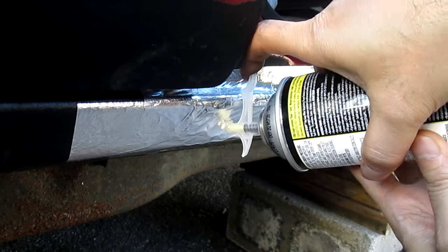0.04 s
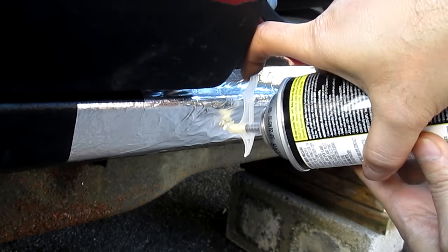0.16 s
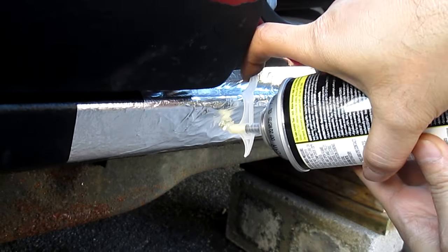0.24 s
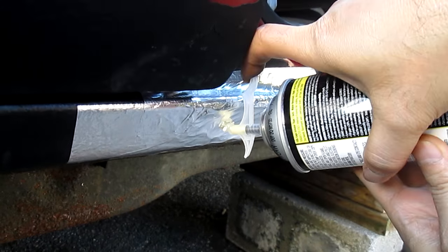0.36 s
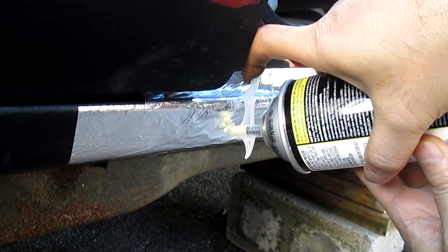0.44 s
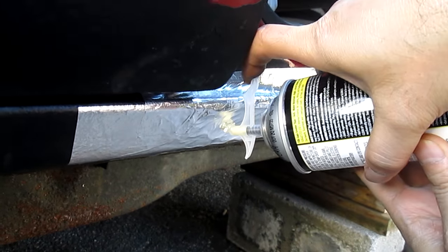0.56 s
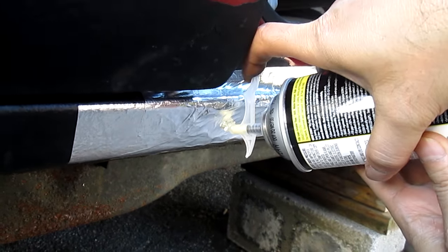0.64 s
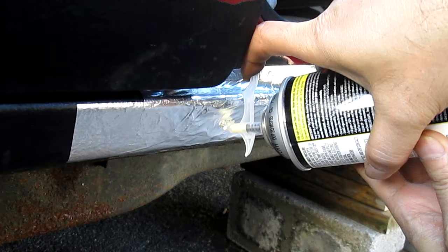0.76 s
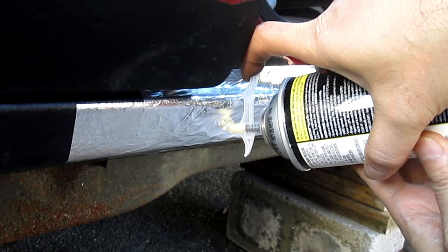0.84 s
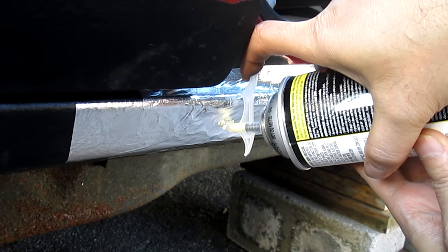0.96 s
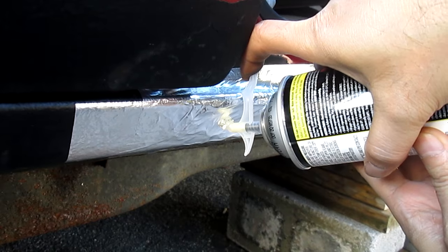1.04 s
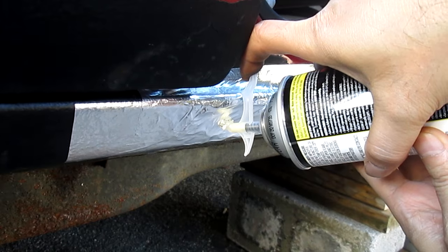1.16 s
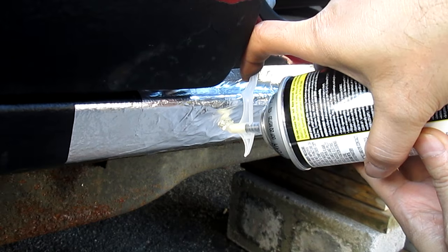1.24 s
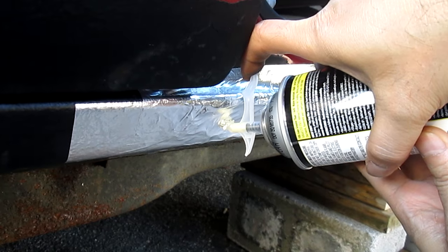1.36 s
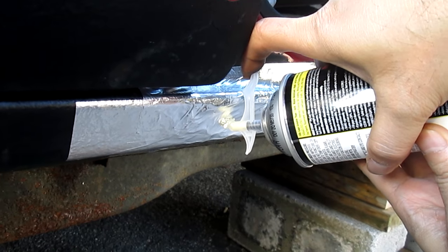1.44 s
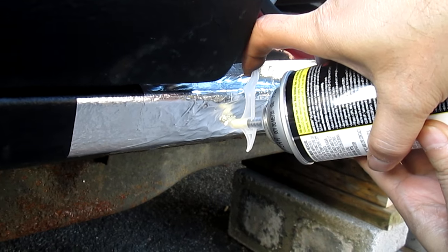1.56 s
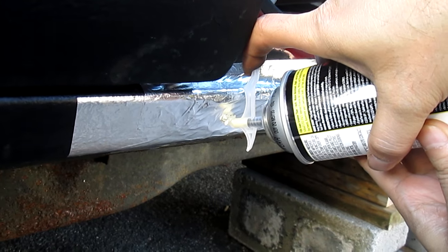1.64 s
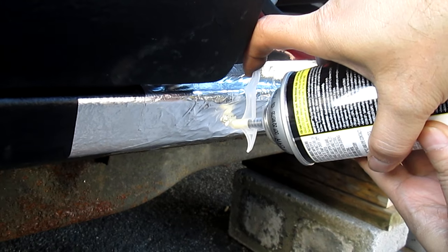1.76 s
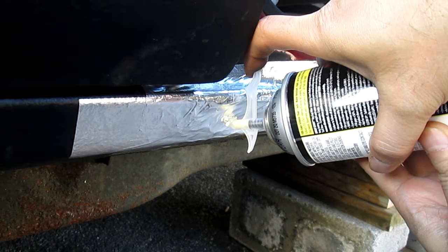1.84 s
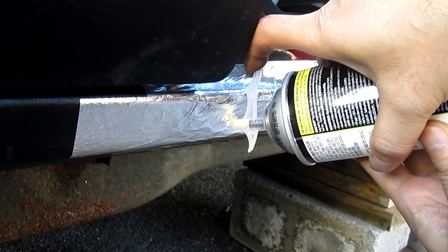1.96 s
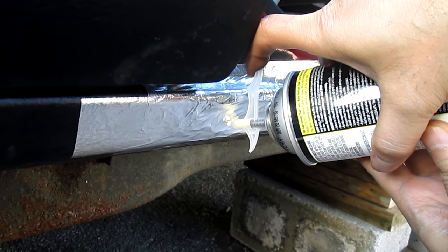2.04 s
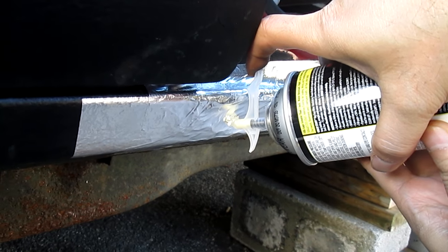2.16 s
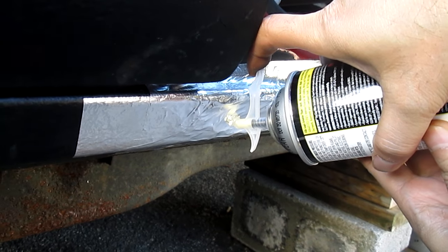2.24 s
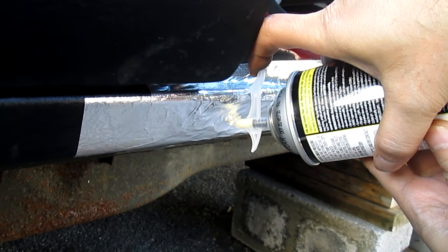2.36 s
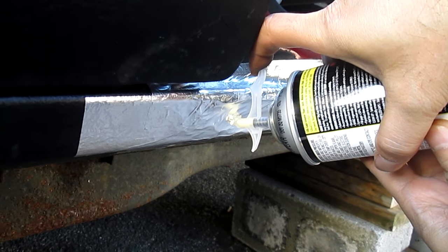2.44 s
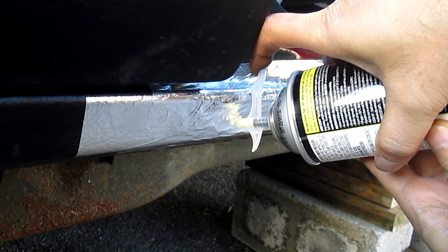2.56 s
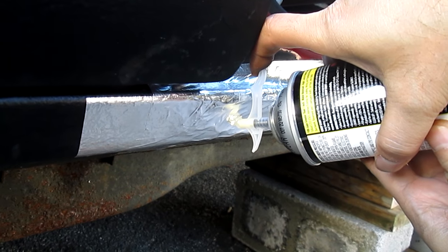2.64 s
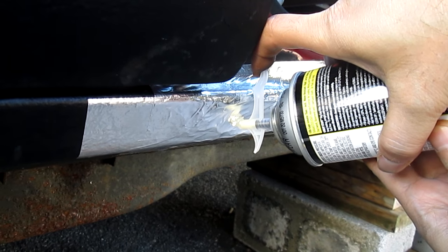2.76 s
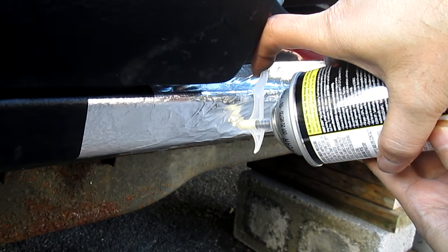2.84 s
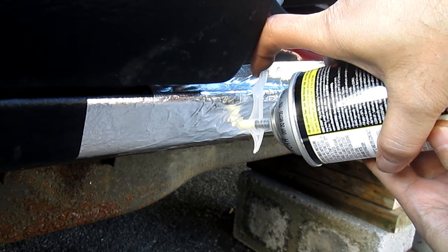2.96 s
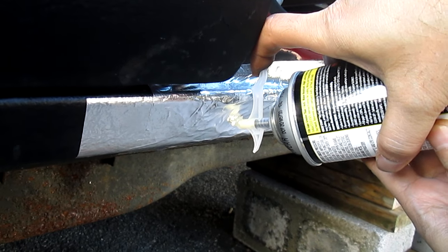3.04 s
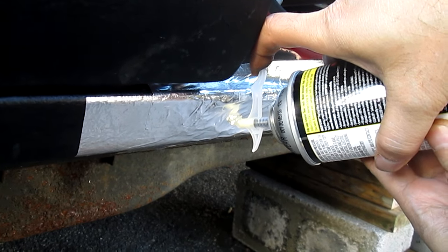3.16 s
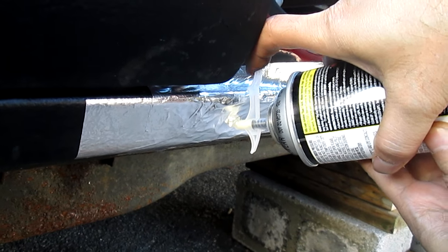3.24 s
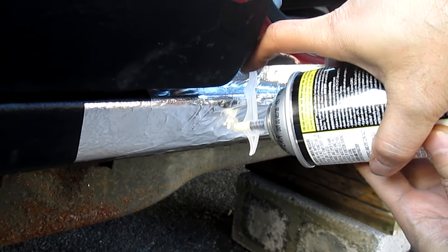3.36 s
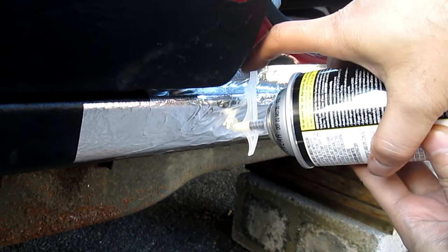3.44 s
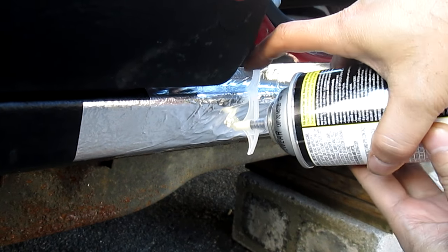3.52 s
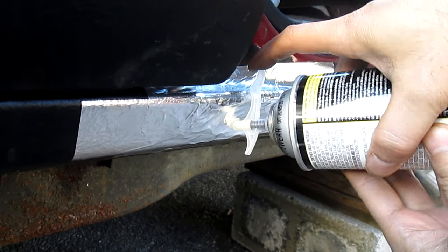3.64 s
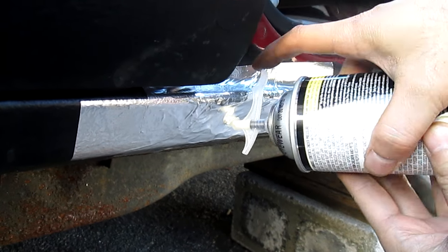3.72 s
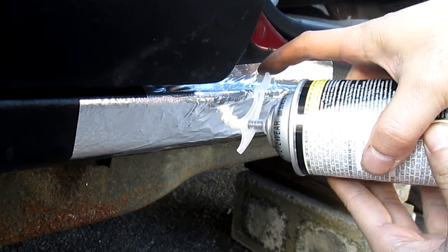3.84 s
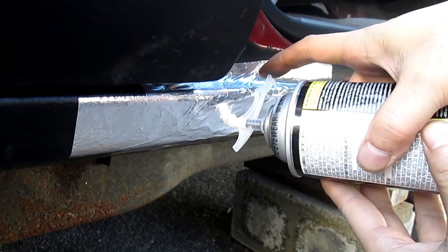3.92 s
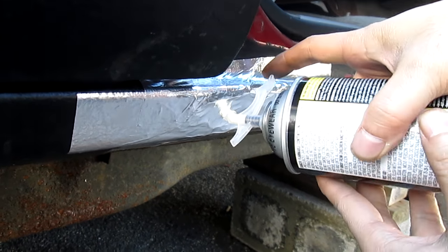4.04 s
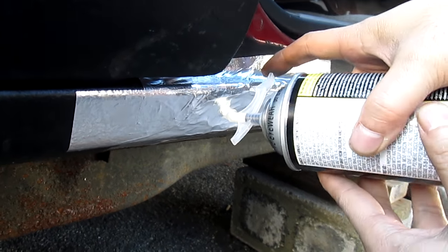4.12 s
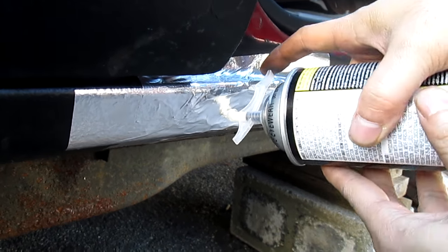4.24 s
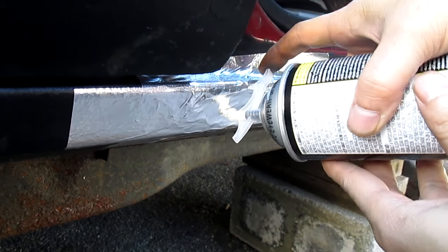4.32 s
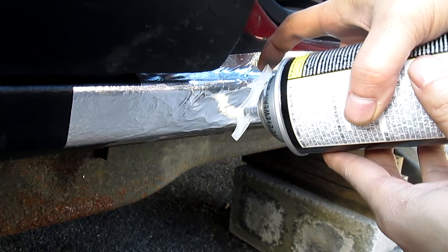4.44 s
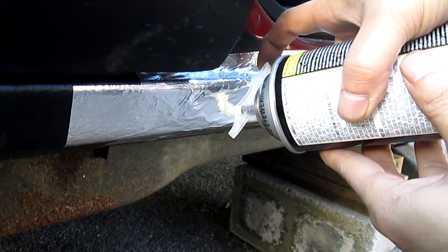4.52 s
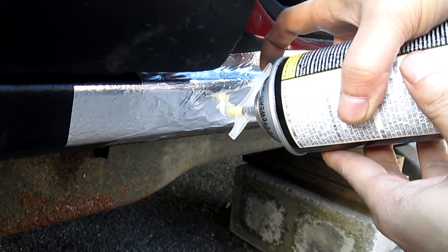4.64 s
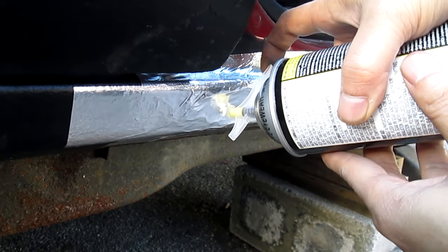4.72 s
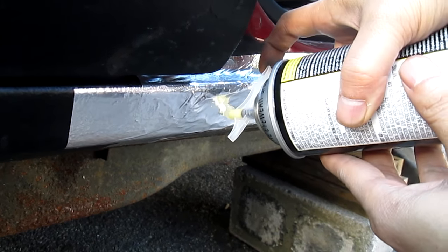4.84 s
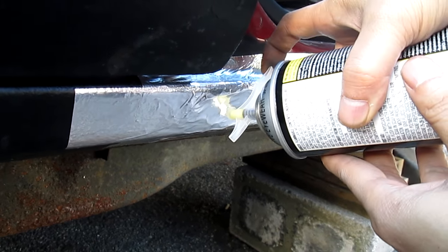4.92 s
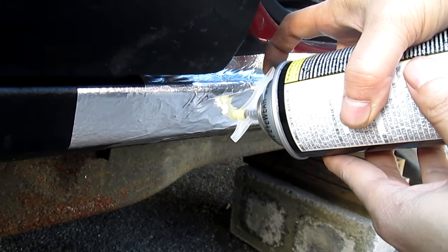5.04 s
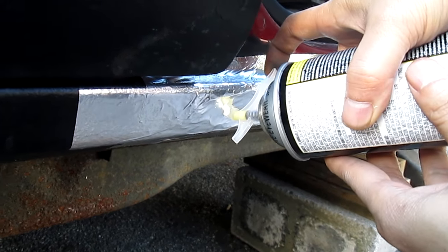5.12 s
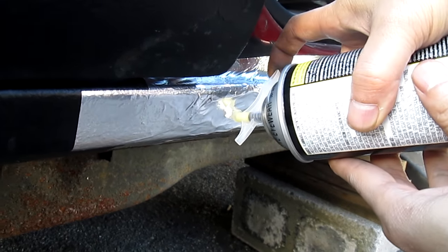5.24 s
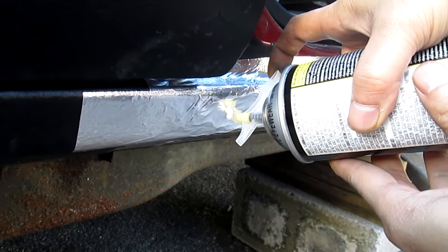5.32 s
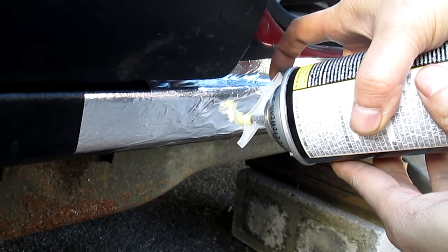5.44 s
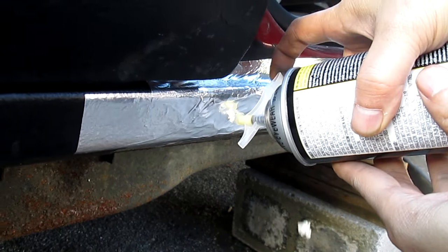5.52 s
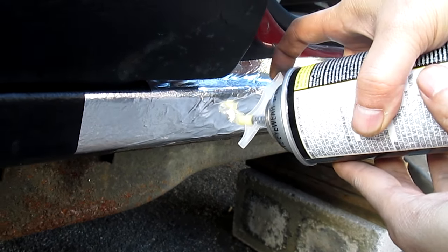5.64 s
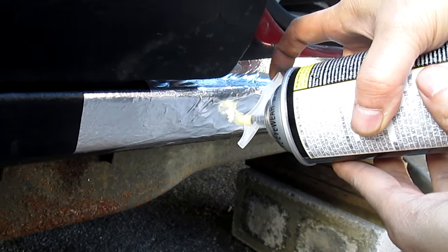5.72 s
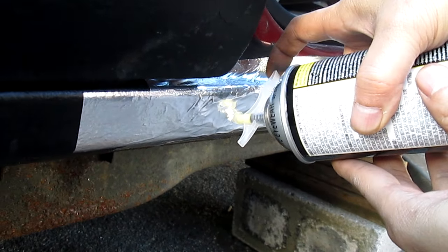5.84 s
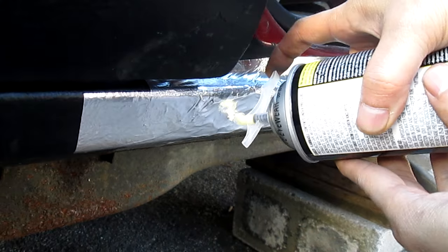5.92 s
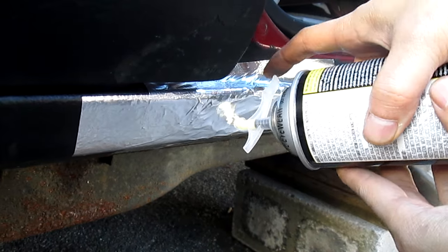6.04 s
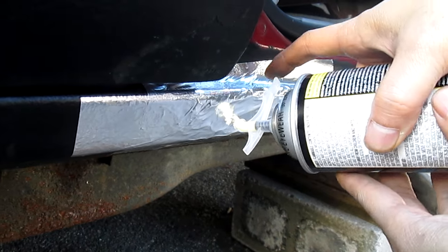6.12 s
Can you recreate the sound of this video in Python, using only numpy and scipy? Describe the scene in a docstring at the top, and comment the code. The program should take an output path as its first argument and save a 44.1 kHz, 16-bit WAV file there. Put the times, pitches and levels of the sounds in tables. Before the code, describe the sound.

Pressurised foam sprays close by in one long fizzing hiss, pauses with a plastic click, then splutters again more wetly over low wind rumble.

```python
"""A can of foam is emptied through its straw into the sill of a car: a long burst, then a short, wetter one.
Gas and foam leave in quick sputters: noise shaped by resonances into a gurgle, rasp, jet hiss and fizz.
The plastic trigger clicks between the bursts, during the second and after it: short noise rings its tones.
Outdoors, wind rumbles on the microphone (low noise), the open air rushes (noise) and engines drone (sines)."""
import sys
import numpy as np
from scipy import signal
from scipy.fft import rfft, irfft
from scipy.io import wavfile
from scipy.ndimage import uniform_filter1d

SR = 44100
rng = np.random.default_rng(int(sys.argv[2]) if len(sys.argv) > 2 else 0)


def store_wav(level_fs):
    """Save 16-bit WAV to argv[1]."""
    pcm = np.round(np.clip(np.atleast_2d(level_fs), -1, 1) * 32767)
    wavfile.write(sys.argv[1], SR, pcm.T.astype(np.int16))


N = 272538

# the seal parts quickly, the finger needs longer to push the valve wide open,
# and once the seal is shut the straw bleeds empty (time to fall to 37 %)
PART_S, PUSH_S, BLEED_S = 0.028, 0.3, 0.010785


def gain_of(db):
    """Turns decibels into a factor."""
    return 10 ** (np.asarray(db) / 20)


def evened(x):
    """Scales a sound to rms 1."""
    return x / np.sqrt(np.mean(x ** 2) + 1e-20)


def ramp(u):
    """Rises from 0 to 1 and stays there."""
    return np.clip(u, 0, 1)


def follow(rows, t):
    """Reads the columns of a table at times t, with straight lines between its rows."""
    s, *columns = np.transpose(rows)
    return [np.interp(t, s, column) for column in columns]


def read(points, hz):
    """Reads a table of f/Hz, level/dB on a log-frequency axis."""
    f, db = np.transpose(points)
    return np.interp(np.log(hz + 1), np.log(f), db)


def bells(rows, hz):
    """Adds up peaks and dips, in dB."""
    return sum(db / (1 + (2 * (hz - f) / width) ** 2) for f, width, db in rows)


def coloured(x, db_at, size=8192):
    """Filters with the gain db_at(Hz), down to -100 dB, without sounding ahead of time."""
    db = np.maximum(db_at(np.fft.rfftfreq(size, 1 / SR)), -100)
    log_gain = np.log(gain_of(np.r_[db, db[-2:0:-1]]))
    # the minimum-phase filter of this gain
    spectrum = np.exp(np.conj(signal.hilbert(log_gain)))
    taps = np.fft.ifft(spectrum).real
    return signal.oaconvolve(x, taps[:size // 2])[:len(x)]


def resonate(x, hz, width):
    """A resonance of gain 1, width in Hz, that follows the curve hz."""
    turn = np.exp(2j * np.pi * np.cumsum(hz) / SR)
    r = np.exp(-np.pi * width / SR)
    # shift the resonance down to 0 Hz, smooth there, and shift back
    smoothed = signal.lfilter([1 - r], [1, -r], x / turn)
    return 2 * (turn * smoothed).real


def wander(n, hz):
    """Slow random drift, made of frequencies up to about hz."""
    f = np.fft.rfftfreq(N, 1 / SR)
    slow = rfft(rng.standard_normal(N)) / (1 + (f / hz) ** 4)
    return evened(irfft(slow, N))[:n]


def add(mix, s, sound):
    """Mixes a sound in at time s."""
    part = mix[round(s * SR):][:len(sound)]
    part += sound[:len(part)]


def wash(level_db, flicker_db):
    """The rush of the open air: noise with a fixed colour and a slight flicker."""
    # colour of the open air: f/Hz, level/dB (relative)
    air_colour = [(100, -6), (350, -4.5), (500, 0.5), (650, -2), (820, -2.5), (1040, -4.5), (1350, -8.5),
                  (1600, -11.5), (2700, -19.5), (3500, -23.5), (4400, -25), (7000, -30), (10000, -36),
                  (13000, -43), (15000, -56)]
    air = evened(coloured(rng.standard_normal(N), lambda hz: read(air_colour, hz)))
    return air * gain_of(level_db + flicker_db * wander(N, 40))


def hum(t, hz, db, waver, fading_db):
    """One engine order, a sine: it swells in, wavers in pitch and level, and dies away."""
    fade_s = 0.14
    turn = 2 * np.pi * np.cumsum(hz * (1 + waver * wander(len(t), 8.2))) / SR
    swell = ramp((t - t[0]) / fade_s) * ramp((t[-1] - t) / fade_s)
    level = gain_of(db + fading_db * wander(len(t), 3.6))
    return t[0], swell * level * evened(np.sin(turn))


def engines(waver, fading_db):
    """Engines heard from afar: only their lowest orders, slow sines, carry this far."""
    # values that hum() lets waver; a nearer engine idles: t/s, f/Hz, level/dB
    idle = [(0, 39.5, -30), (0.45, 39, -27.5), (0.85, 38.57, -33.5), (1.15, 39.29, -27.5),
            (1.95, 38.1, -32), (2.25, 38.23, -26), (2.6, 38.56, -27.5), (2.85, 39, -37),
            (4.05, 39.8, -28.5), (4.6, 40, -47.5)]
    # a far engine slowly gathers speed: t/s, f/Hz, fundamental level/dB, second order level/dB
    far_engine = [(0, 70.8, -35, -47.5), (0.9, 70.7, -34.5, -46), (1.2, 73.86, -25.5, -36.5),
                  (1.65, 75, -31.5, -42.5), (2.0, 75.22, -23.5, -34), (2.2, 74.5, -33.5, -38),
                  (2.5, 75.03, -27, -36), (3.3, 78.86, -31, -38), (3.899, 77.17, -42.5, -29.5),
                  (4.3, 81.55, -44, -33), (4.95, 79.6, -46, -35.5)]
    # other traffic drones in and out: start t/s, end t/s, start f/Hz, end f/Hz, level/dB
    drones = [(4.15, 4.84, 91.8, 98.4, -33), (4.799, 5.75, 53.2, 52.6, -37.5), (5.6, 6.3, 127, 124.9, -34)]
    out = np.zeros(N)
    t = np.arange(idle[0][0], idle[-1][0], 1 / SR)
    add(out, *hum(t, *follow(idle, t), waver, fading_db))
    t = np.arange(far_engine[0][0], far_engine[-1][0], 1 / SR)
    hz, first_db, second_db = follow(far_engine, t)
    add(out, *hum(t, hz, first_db, waver, fading_db))
    add(out, *hum(t, 2 * hz, second_db, waver, fading_db))
    for start, end, start_hz, end_hz, db in drones:
        t = np.arange(max(start, 0), end, 1 / SR)
        add(out, *hum(t, np.linspace(start_hz, end_hz, len(t)), db, waver, fading_db))
    return out


def wind(t, trim_db, lumps_db):
    """Wind on the microphone: lumpy low noise, with a few buffets of wavering pitch."""
    # colour of the rumble: f/Hz, level/dB (relative)
    rumble_colour = [(12, -9), (25, -15), (55, 0.5), (100, 1), (135, -3), (185, -5), (240, -8.5),
                     (330, -15.5), (600, -52), (1200, -70.5)]
    # strength of the wind before trim and lumps: t/s, level/dB
    strength = [(0.0, -27.5), (2.1, -29.5), (2.65, -29), (3.8, -28), (4.65, -27.5), (4.9, -32),
                (5.3, -24.5), (5.55, -27), (6.18, -26.5)]
    # gusts that buffet the microphone: middle t/s, length/s, mean f/Hz, level before fading in and out/dB
    gusts = [(4.669, 0.24, 99.7, -23), (5.975, 0.095, 107.3, -21.5)]
    rumble = evened(coloured(rng.standard_normal(N), lambda hz: read(rumble_colour, hz)))
    out = rumble * gain_of(follow(strength, t)[0] + trim_db + lumps_db * wander(N, 9.913))
    for s, length, hz, db in gusts:
        n = round(length * SR)
        eddy = np.sin(2 * np.pi * np.cumsum(hz * (1 + 0.17 * wander(n, 40))) / SR)
        add(out, s - length / 2, gain_of(db) * evened(eddy) * np.hanning(n))
    return out


def outdoors(x, echo_db, t60_s):
    """The surroundings return a faint, short echo: a dying tail of noise."""
    t = np.arange(SR // 3) / SR
    tail = rng.standard_normal(len(t)) * gain_of(-60 * t / t60_s)
    return x + gain_of(echo_db) * signal.oaconvolve(x, tail / np.linalg.norm(tail))[:N]


def click(s, peak_db, bright_db, thump_db):
    """The trigger snaps and chatters briefly, ringing its tones; the can jolts in the hand, a low thump."""
    # what trigger and can ring with: f/Hz, level/dB (relative), time to fall by 60 dB/s
    ring_tones = [(990.73, -10, 0.018035), (1497, -1, 0.01), (1976.6, 0, 0.0084), (2380, 5, 0.011),
                  (2660, 8.5, 0.0086), (3280, -4, .006)]
    t = np.arange(SR // 8) / SR
    snap = 0.19 * rng.standard_normal(len(t)) * np.exp(-t / 0.0061)
    snap[0] = 1
    modes = sum(gain_of(db - 60 * t / t60) * np.sin(2 * np.pi * hz * t) for hz, db, t60 in ring_tones)
    ring = signal.oaconvolve(snap, modes)[:len(t)]
    ring = coloured(ring, lambda hz: bright_db * np.log2(np.clip(hz, 500, 9000) / 2000))
    thump = -np.sin(2 * np.pi * 62 * t) * np.exp(-t / 0.032)
    return s, gain_of(peak_db) * ring / abs(ring).max() + gain_of(thump_db) * thump


def scattered(x, echo_db, fade_s):
    """Hand, can, car and ground throw the sound back within a few milliseconds: sparse random echoes."""
    t = np.arange(SR // 30) / SR
    signs = rng.choice([-1, 1], len(t))
    present = (rng.random(len(t)) < .1) * (t > .001)
    taps = signs * present * np.exp(-t / fade_s)
    taps *= gain_of(echo_db) / np.linalg.norm(taps)
    taps[0] = 1  # the direct sound
    return signal.oaconvolve(x, taps)[:len(x)]


def valve(press, t):
    """How freely gas passes the seal, and how wide the valve stands, both 0-1."""
    start, stop, let_go_s = press
    bleed = np.exp(-np.maximum(t - stop, 0) / BLEED_S)
    parted = ramp((t - start) / PART_S) ** 2 * bleed
    return parted, ramp((t - start) / PUSH_S) * ramp((stop - t) / let_go_s)


def flow_levels(flow, t, opening, unsteady_db):
    """Levels of gurgle, rasp, jet and fizz in dB: the flow, lifted by spurts and choked by the valve."""
    # a plug of foam or pocket of gas comes through: middle t/s, length/s, foam change/dB, gas change/dB
    spurts = [(1.504, 0.11, -1.5, 1.5), (3.343, 0.0586, -0.5, 1.5), (4.587, 0.16, -2, 9.5),
              (4.697, 0.11, 9, 4), (4.999, 0.06, 1.5, 1.5)]
    # a barely open valve chokes the fizz most, the rasp hardly: gurgle/dB, rasp/dB, jet/dB, fizz/dB
    choke_db = [-12.5, -0.5, -14.5, -35]
    rasp_share = 0.28  # share of a spurt that reaches the rasp
    gurgle, rasp, jet, fizz = follow(flow, t)
    foam = np.zeros(len(t))
    gas = unsteady_db * wander(len(t), 9.7)
    for s, length, foam_db, gas_db in spurts:
        arch = np.sin(np.pi * ramp((t - s) / length + .5)) ** 2
        foam = foam + foam_db * arch
        gas = gas + gas_db * arch
    levels = [gurgle + foam, rasp + rasp_share * (foam + gas), jet + gas, fizz + gas]
    return [level + choke * (1 - opening) ** 1.5 for level, choke in zip(levels, choke_db)]


def sputters(rate, jitter, puff_s):
    """Strength of the gas flow: each slug of foam that clears the straw lets a short puff through."""
    n = len(rate)
    uneven_rate = rate * np.exp(jitter * wander(n, 71.108) - jitter ** 2 / 2)
    turns = np.cumsum(uneven_rate) / SR
    kicks = np.zeros(n)
    kicks[np.flatnonzero(np.diff(np.floor(turns)))] = 1
    u = np.arange(SR // 50) / SR / puff_s
    puff = u ** 2 * np.exp(-u)
    return evened(signal.oaconvolve(kicks, puff)[:n])


def foam_spits(n, per_s):
    """Bursting bubbles: random spits of well under a millisecond each."""
    sizes = rng.uniform(0.21, 1, n) * (rng.random(n) < per_s / SR)
    return evened(signal.oaconvolve(sizes, np.hanning(SR // 1400), "same"))


def gas_jet(spray, t, press, opening, jet_hz, jet_db):
    """Hiss of the gas: the outlet resonates, and a barely open valve narrows it to a whistling slit."""
    # through a barely open valve the jet rings low and strongly, and the slit itself whistles
    slit_hz, slit_db = 4700, 3
    whistle_hz, whistle_db = 4480, 15
    dull_hz, dull_db_per_octave = 6500, 15
    # as the valve opens, the resonance moves from the slit's pitch and level to those of the outlet
    slit = np.cos(np.pi / 2 * opening) ** 2
    jet_hz = jet_hz + slit * (slit_hz - jet_hz)
    jet_db = jet_db + (1 - opening ** 2) * (slit_db - jet_db)
    jet = spray + gain_of(jet_db) * resonate(spray, jet_hz, width=700)
    # the outlet also cancels part of the hiss close to its resonance
    jet -= np.minimum(gain_of(jet_db), 1) * 0.48 * resonate(jet, jet_hz * 0.99, width=620)
    # the slit whistles only while the seal is first pushed open
    cracking = slit ** 3 * (t < press[0] + PUSH_S)
    whistle = resonate(spray, np.full(len(t), whistle_hz), width=420)
    jet += gain_of(whistle_db) * cracking * whistle
    # the narrower the slit, the duller the hiss
    dull = coloured(jet, lambda hz: -dull_db_per_octave * np.log2(np.maximum(hz / dull_hz, 1)))
    return (1 - slit) * jet + slit * dull


def burst(press, flow, outlet, colour, jitter, puff_s, steady_db, spit_db, spits_per_s, churn_db, trim_db):
    """Puffs of gas and spits of foam, as noise, excite the outlet and the nook between can and car."""
    # peaks and dips of the nook between can and car body: f/Hz, width/Hz, level/dB
    nook = [(405, 35, 1.5), (455, 35, -2.5), (520, 50, 3.5), (650, 80, -7.5), (1045, 45, 4),
            (1120, 130, -7.5), (1690, 90, -5.7), (2860, 100, -8.5), (3280, 200, -11), (3720, 380, -7.3),
            (4160, 300, -6.8), (4830, 140, -9.5), (5250, 220, -8.6), (5560, 110, -7), (5990, 450, -7.4),
            (6470, 220, -3.5), (6870, 390, -7.8), (7550, 270, -6.7), (8440, 120, -5.5), (8780, 160, -4),
            (9060, 150, 5), (9420, 260, 3.5), (9970, 140, 5.5), (10760, 130, -4), (11890, 200, -3.6),
            (12360, 130, -5), (12780, 160, -6)]
    # where gurgle, rasp, jet and fizz meet, with the outer limits: f/Hz
    edges_hz = [250, 2000, 5000, 10500, 17000]
    # small things scatter the treble most: gurgle/dB, rasp/dB, jet/dB, fizz/dB
    scatter_db = [-21, -13.5, -11.5, -9]
    t = np.arange(max(press[0], 0), press[1] + 10 * BLEED_S, 1 / SR)
    n = len(t)
    parted, opening = valve(press, t)
    jet_hz, jet_db, gurgle_hz, sputter_rate = follow(outlet, t)
    puffs = sputters(sputter_rate, jitter, puff_s)
    spits = foam_spits(n, spits_per_s)
    strength = (gain_of(steady_db) + puffs) * (1 + gain_of(spit_db) * spits)
    spray = evened(strength * rng.standard_normal(n))
    # the foam churns more evenly than the gas escapes
    churn = spray + gain_of(churn_db) * rng.standard_normal(n)
    gurgle = churn + 0.85 * resonate(churn, gurgle_hz, width=800)
    jet = gas_jet(spray, t, press, opening, jet_hz, jet_db)
    # gurgle, rasp, jet and fizz each follow their own share of the flow
    out = np.zeros(n)
    levels = flow_levels(flow, t, opening, unsteady_db=0.44)
    filter_sizes = [401, 101, 41, 41]
    layers = zip([gurgle, jet, jet, jet], edges_hz, edges_hz[1:], levels, trim_db, scatter_db, filter_sizes)
    for drive, lo, hi, level_db, trim, echo_db, size in layers:
        echoed = scattered(drive, echo_db, fade_s=0.0081)
        sound = coloured(echoed, lambda hz: read(colour, hz) + bells(nook, hz))
        band_filter = signal.firwin(size, [lo, hi], pass_zero=False, fs=SR)
        band = signal.oaconvolve(sound, band_filter, "same")
        # the can's pressure keeps the mean flow even over many sputters
        band /= np.sqrt(uniform_filter1d(band ** 2, SR // 9) + 1e-12)
        out += gain_of(level_db + trim) * band
    return t[0], parted * out


def scene():
    """Two bursts and the trigger's clicks over wind, open air and far engines."""
    # the two presses, the first just before the scene begins: valve cracks t/s, valve seals t/s, let go/s
    long_press, short_press = (-0.4, 3.384, 0.042), (4.456, 5.96, 0.1)
    # flow with the valve open, before spurts and trim:
    # t/s, foam gurgle level/dB, straw rasp level/dB, gas jet level/dB, bubble fizz level/dB
    long_flow, short_flow = [(0, -29.5, -28, -20, -28), (0.14, -29.5, -32.5, -23.5, -32.5),
                             (0.18, -29.5, -31.5, -21.5, -25.5), (1.48, -27.5, -30.5, -17, -24),
                             (1.75, -29.5, -33, -18.5, -28), (2.02, -28, -32.5, -16, -24),
                             (2.13, -29, -33, -19, -30.5), (2.5, -27.5, -34.5, -18, -28.5),
                             (2.68, -27.5, -35, -20.5, -29.5), (3.05, -26.5, -34, -19, -27),
                             (3.3, -27.5, -34, -22, -33)], [(4.64, -25, -31.5, -24, -27.5),
                                                (4.71, -27, -28.5, -18.5, -22.5),
                                                (4.79, -27, -29.5, -19.5, -20),
                                                (4.93, -27.5, -32, -17.5, -27.5),
                                                (5.06, -26.5, -34.5, -22.3, -29),
                                                (5.38, -21.5, -28.5, -23, -29),
                                                (5.5, -23, -30.5, -26, -22.5),
                                                (5.86, -20.5, -30, -24.5, -21.5)]
    # with the valve wide open, the trigger sets the pitch of the jet; foam at the outlet sets that of
    # the gurgle and how fast slugs interrupt the gas:
    # t/s, jet f/Hz, jet resonance level/dB, gurgle f/Hz, mean sputters per second
    long_outlet, short_outlet = [(0, 10400, -26.5, 640, 100), (0.25, 10000, -26, 660, 128),
                                 (0.65, 9800, -26, 690, 103.5), (1.2, 9446, -28, 740, 104.5),
                                 (1.68, 9400, -23, 730, 122), (2.0, 9300, -29, 700, 100),
                                 (2.4, 7660, -14, 800, 125), (3.25, 7623, -26, 1090, 121)], [(4.73, 8000, -13, 1280, 160),
                                                      (4.83, 10000, 5, 1246, 165),
                                                      (4.96, 9500, 8, 1105, 170),
                                                      (5.25, 7300, -6, 700, 185),
                                                      (5.4, 5899, -20, 517, 192),
                                                      (5.85, 8600, -26.5, 584.6, 170)]
    # colour of each burst, before each band is set to its flow level: f/Hz, level/dB (relative)
    long_colour, short_colour = [(280, -14), (400, -4.5), (500, -3.5), (780, -5), (1050, -7.5), (1550, -4),
                                 (1800, -18), (2300, -19.5), (3500, -8.5), (4600, -11), (7200, -3),
                                 (9800, -11), (12300, -15.5), (15000, -31.5)], [(280, -7.5), (500, -1.5), (780, -0.5), (1500, -3),
                                                      (2030, -7), (2200, -12), (3400, -0.5), (4600, -11.5),
                                                      (6000, -2.5), (9000, -8.5), (10400, -17),
                                                      (11500, -12.5), (14300, -22.5), (15500, -35)]
    # clicks of trigger and can in the hand: t/s, ring peak level/dB, brightness/dB per octave, thump level/dB
    clicks = [(3.8354, -40, 8, -56.5), (3.9047, -11, -1.5, -16.5), (4.0229, -34, -1.5, -48),
              (5.594, -13, 2, -38.5), (6.066, -37, -10, -30)]
    t = np.arange(N) / SR
    can = np.zeros(N)
    add(can, *burst(long_press, long_flow, long_outlet, long_colour, jitter=.23, puff_s=0.00064, steady_db=2.3,
                    spit_db=-11.5, spits_per_s=2000, churn_db=-1, trim_db=[0.056, 0.1, .1, .1]))
    add(can, *burst(short_press, short_flow, short_outlet, short_colour, jitter=.4, puff_s=0.00051,
                    steady_db=3.5, spit_db=-16.0, spits_per_s=2000, churn_db=-3.0,
                    trim_db=[0.064, 0.15, .1, .1]))
    for row in clicks:
        add(can, *click(*row))
    air = wind(t, trim_db=1.04, lumps_db=1.05)
    air += wash(level_db=-38.0, flicker_db=0.5)
    air += engines(waver=0.0048, fading_db=0.95)
    return (outdoors(can, echo_db=-25, t60_s=0.27) + air)[None]


def record(dry):
    """The microphone port cuts notches, peaks clip at full scale, and the top treble is cut off."""
    # notches of the microphone port: f/Hz, width/Hz, level/dB
    port = [(3963, 71, -24.5), (7790, 156, -7.5)]
    edge_hz = 15720
    heard = np.clip(coloured(dry[0], lambda hz: bells(port, hz)), -1, 1)
    low_pass = signal.firwin(611, edge_hz, window=("kaiser", 9), fs=SR)
    return signal.oaconvolve(heard, low_pass, "same")[None]


dry = scene()
out = record(dry)
store_wav(out)
```